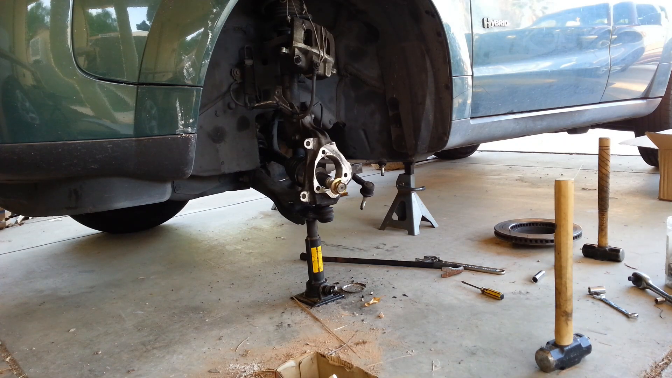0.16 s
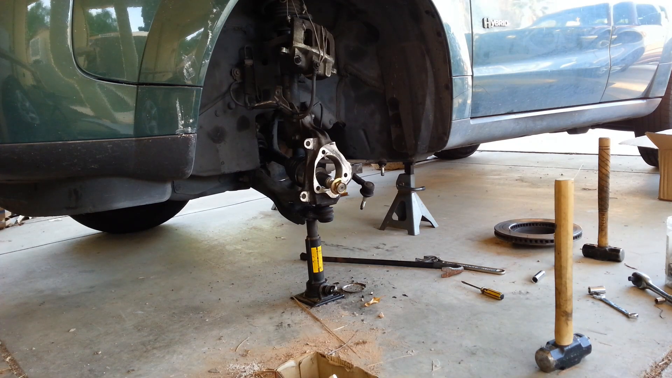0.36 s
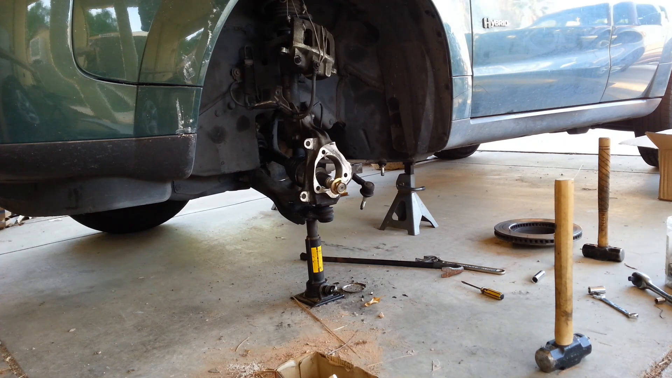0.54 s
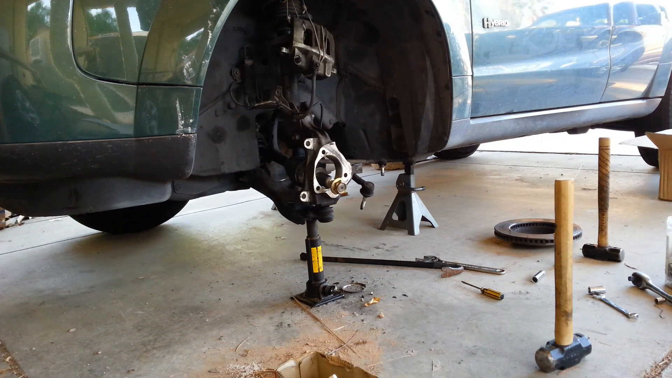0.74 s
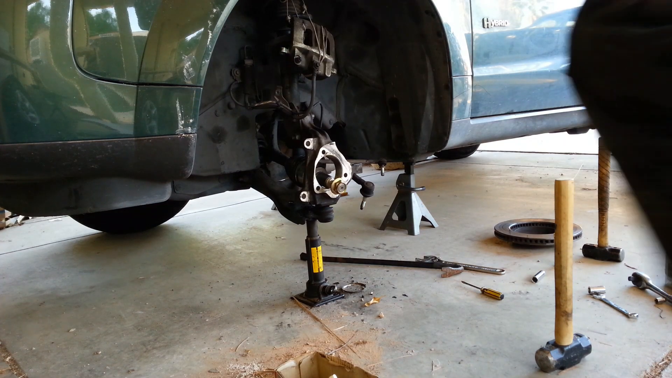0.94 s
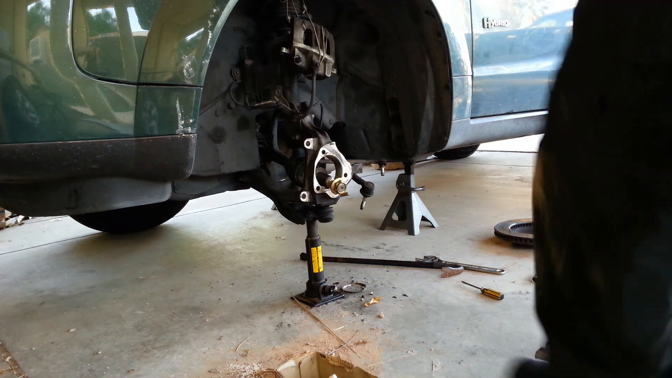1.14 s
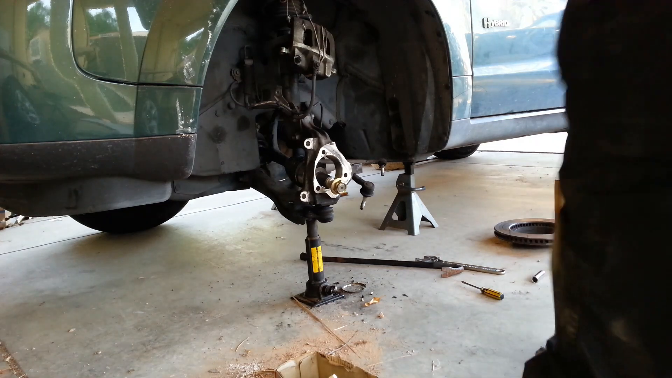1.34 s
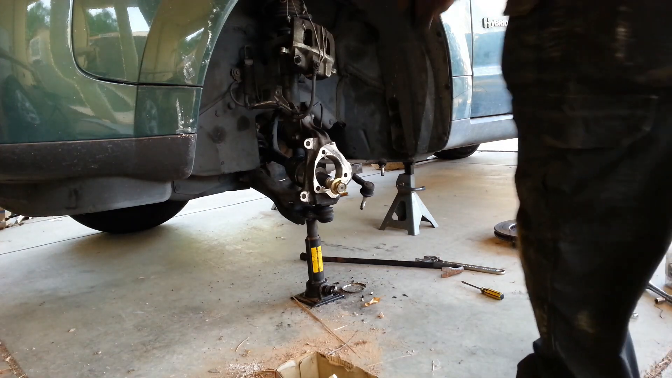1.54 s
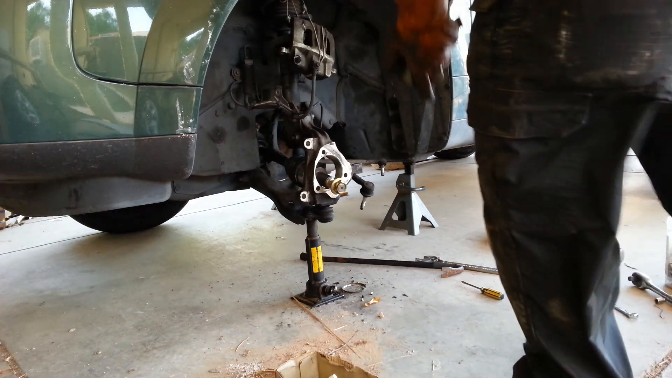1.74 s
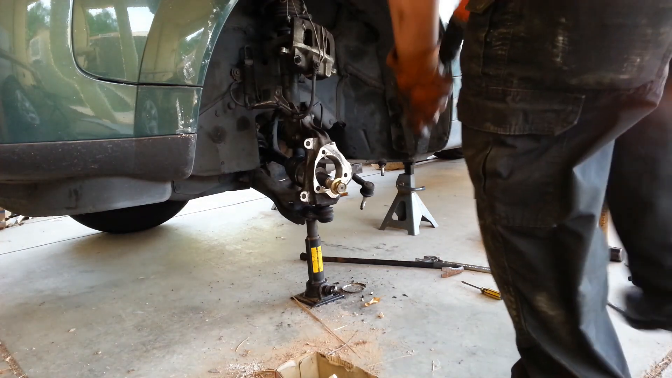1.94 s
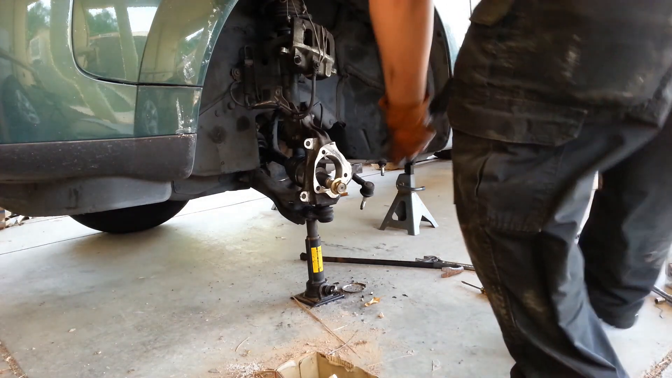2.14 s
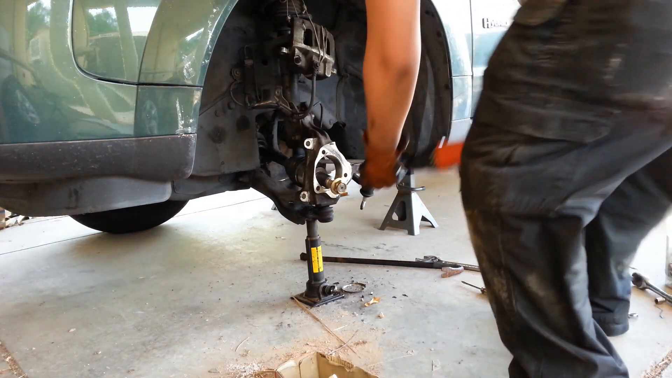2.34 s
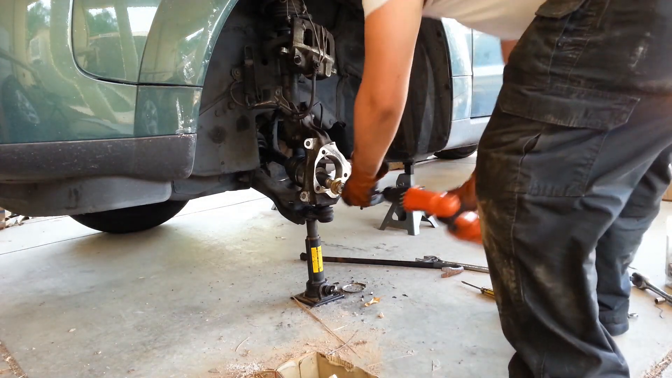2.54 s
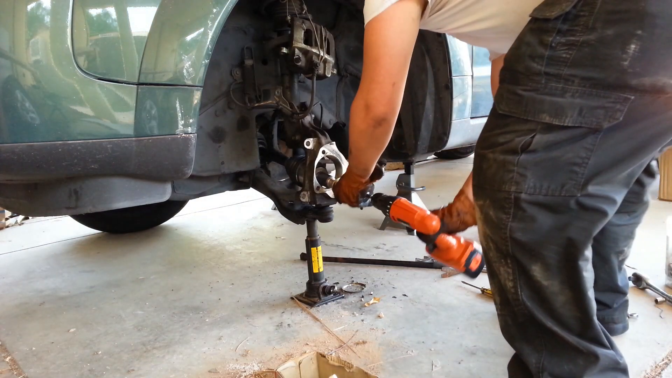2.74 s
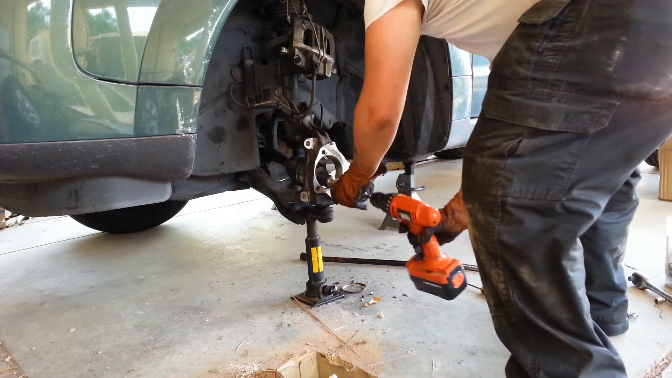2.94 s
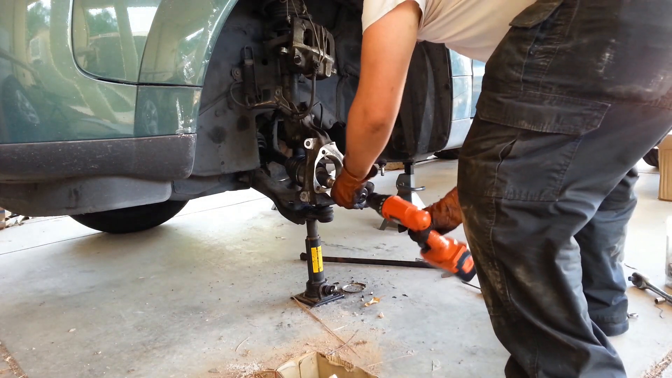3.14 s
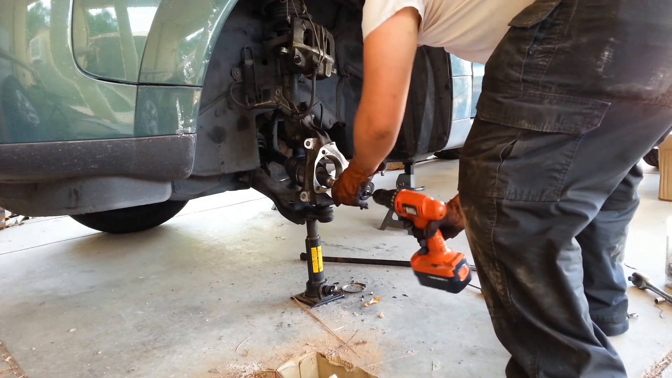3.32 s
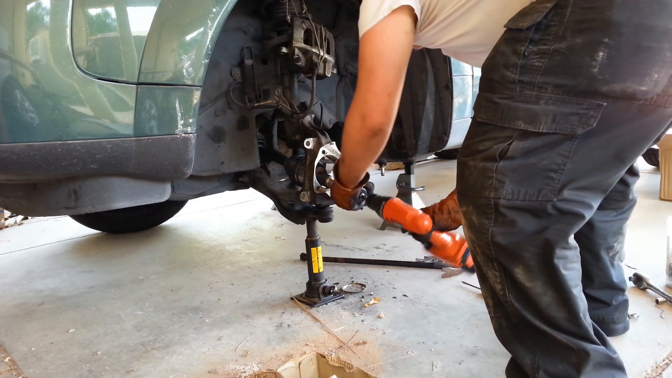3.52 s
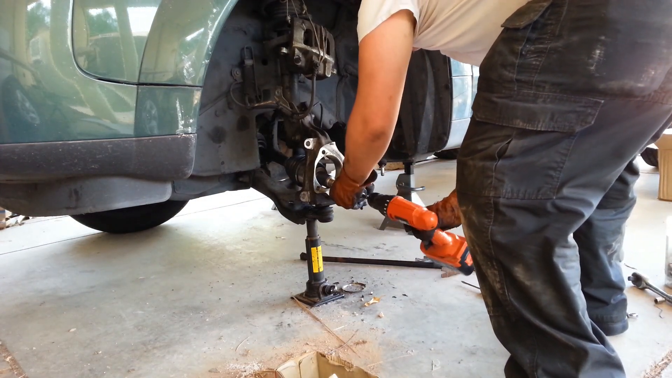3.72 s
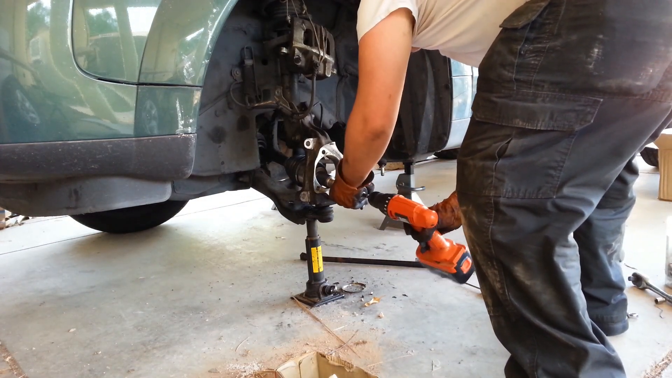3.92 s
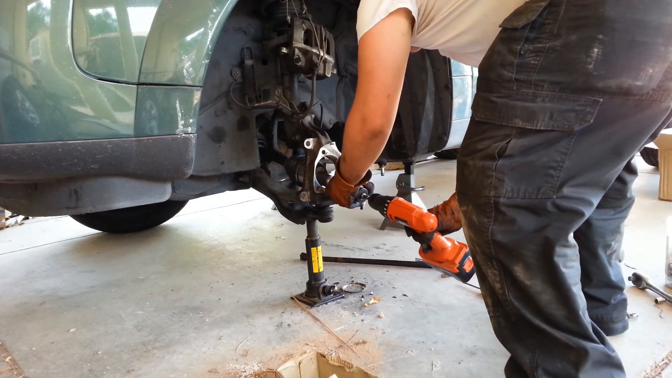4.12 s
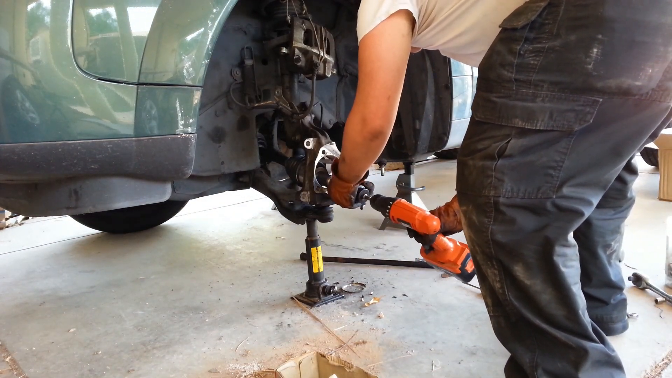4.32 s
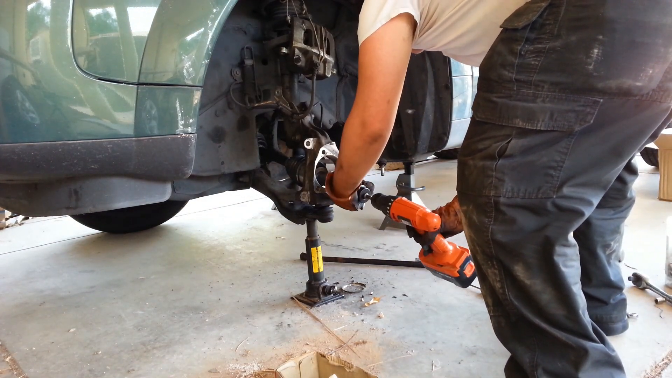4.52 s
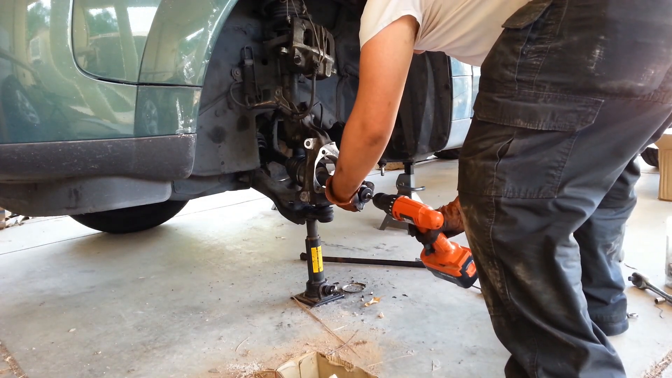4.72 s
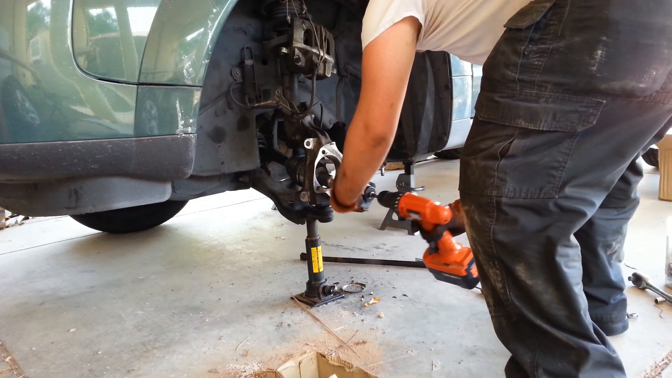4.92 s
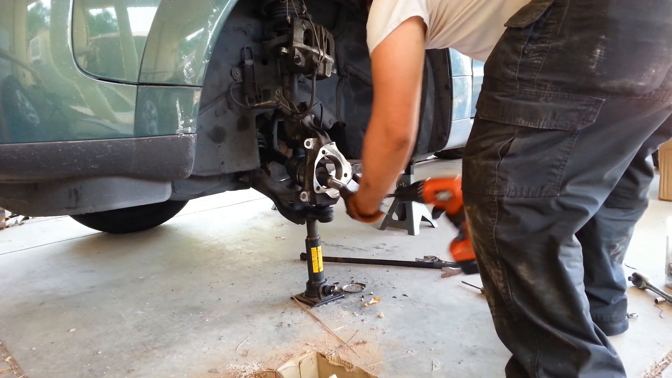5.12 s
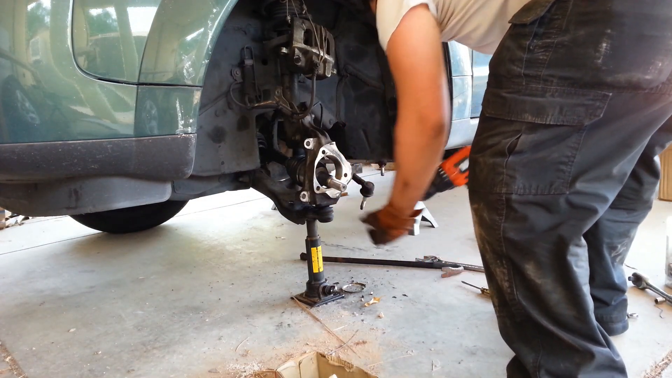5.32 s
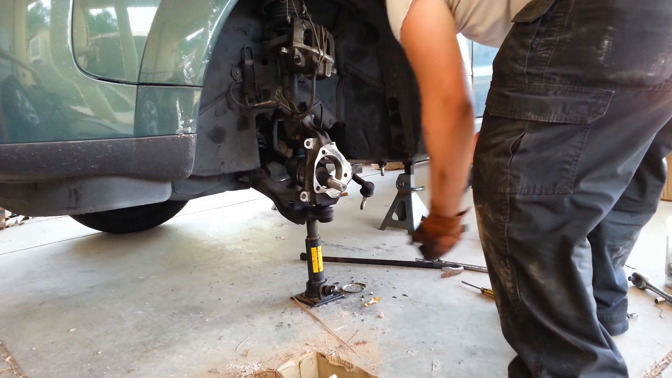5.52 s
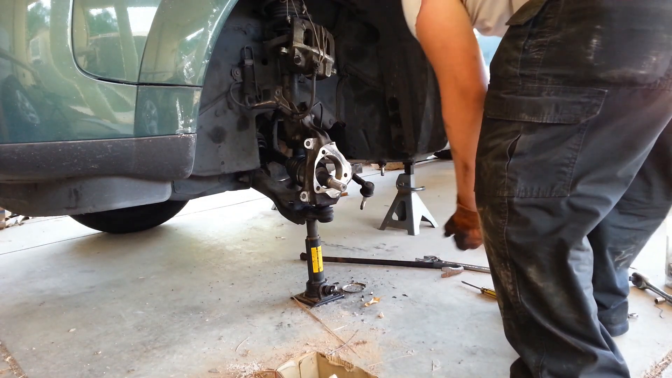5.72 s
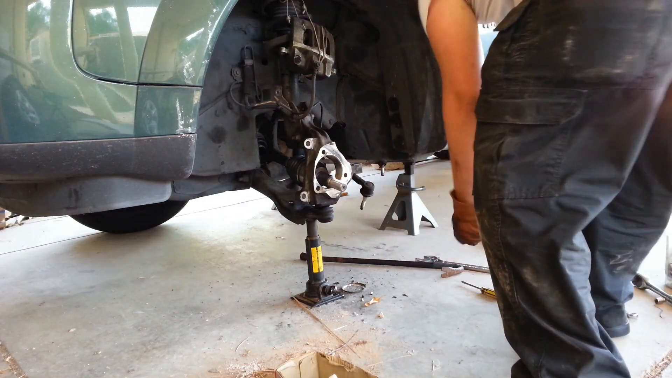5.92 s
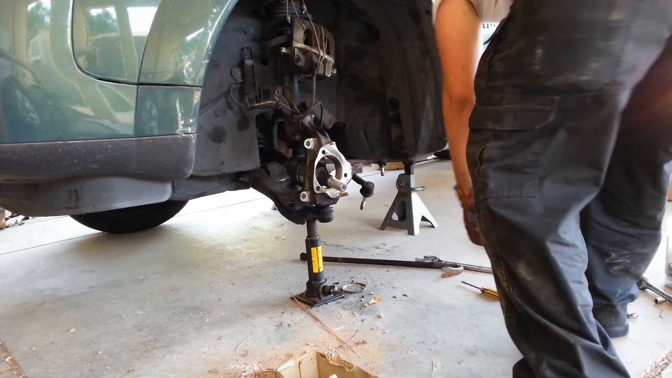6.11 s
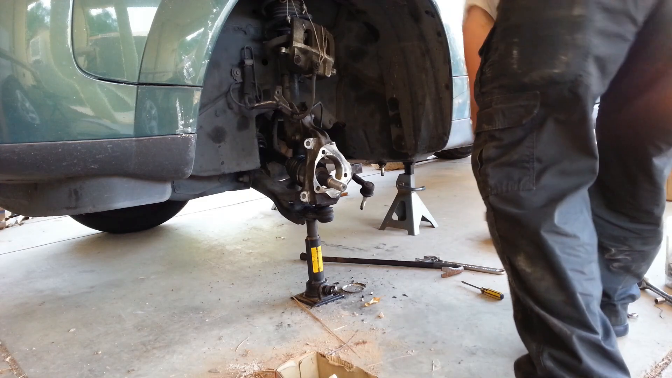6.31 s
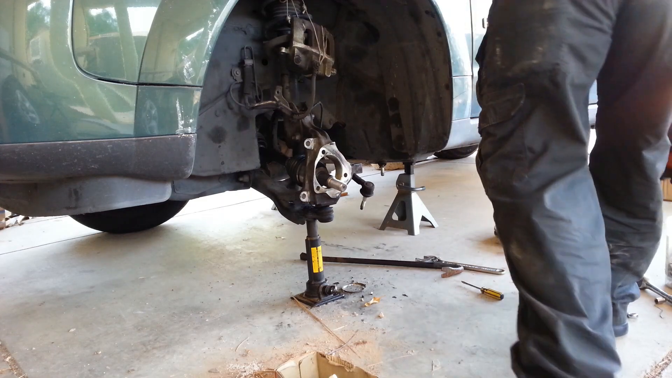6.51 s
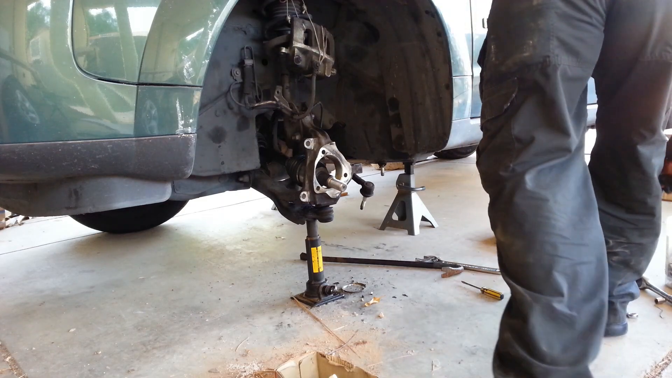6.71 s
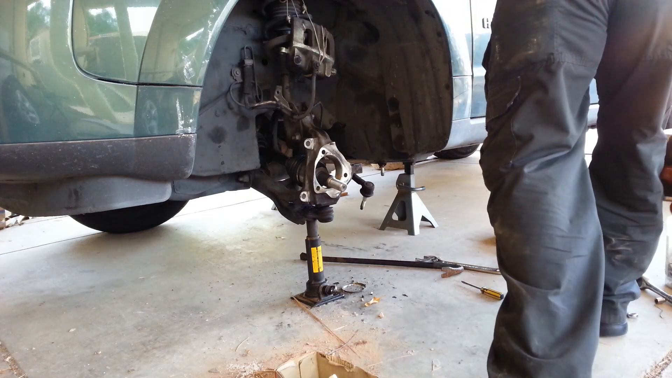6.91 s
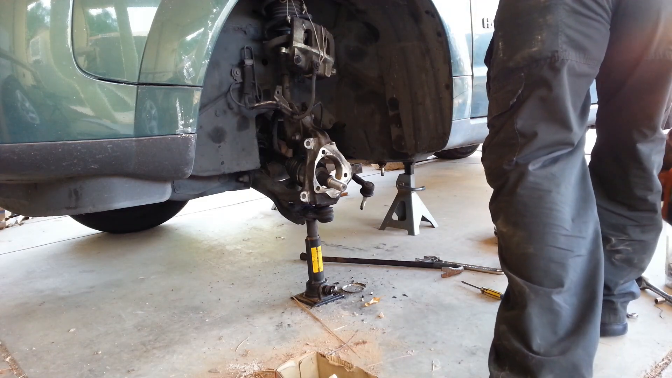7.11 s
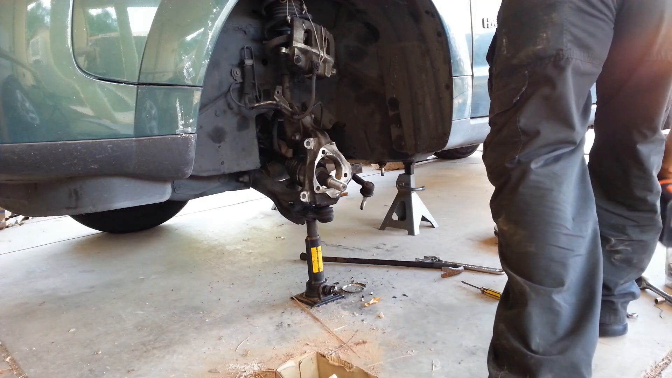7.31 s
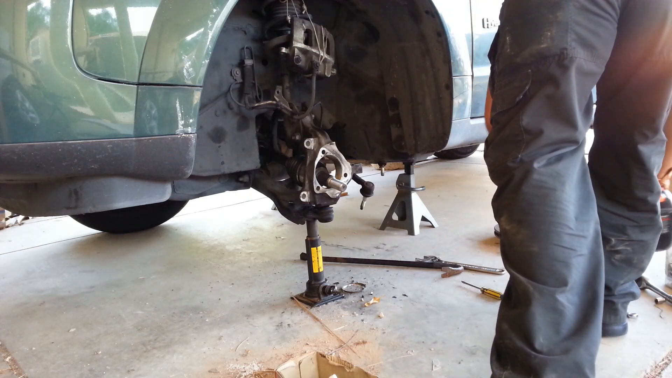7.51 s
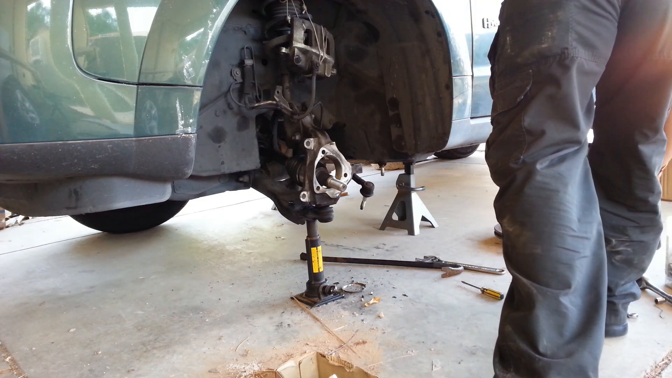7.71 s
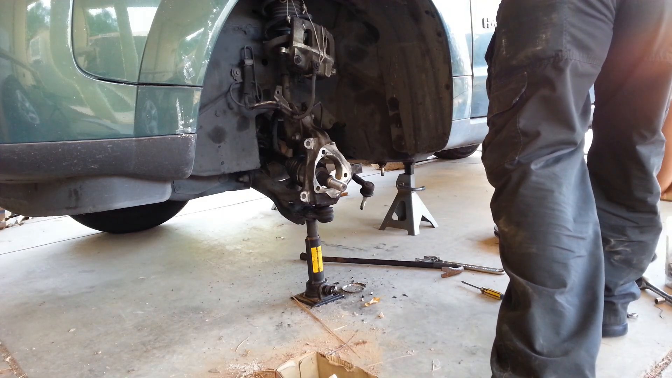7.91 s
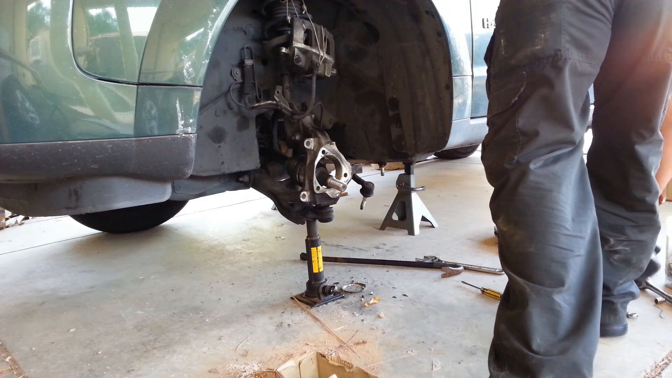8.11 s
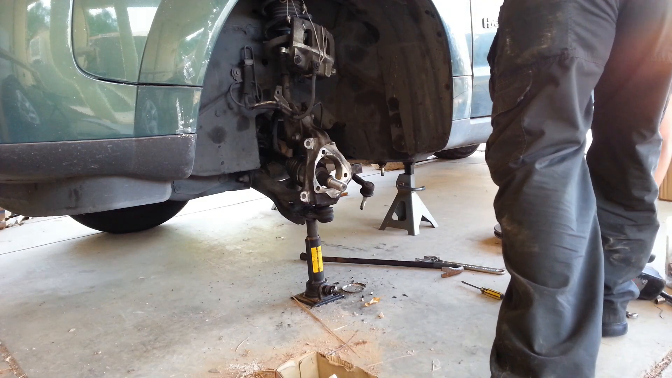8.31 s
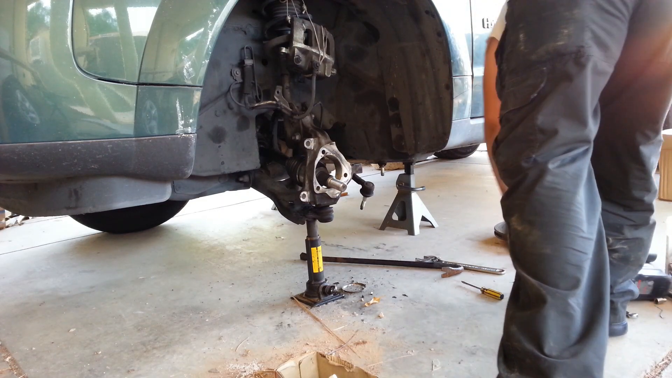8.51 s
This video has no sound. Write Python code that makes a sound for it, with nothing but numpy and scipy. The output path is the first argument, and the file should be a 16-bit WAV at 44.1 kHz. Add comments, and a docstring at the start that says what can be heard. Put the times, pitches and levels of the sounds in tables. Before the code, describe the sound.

In an open concrete garage with faint outdoor air and mains hum, a cordless drill whirs freely for about a second. Work trousers rustle and boots thud, then a socket clanks brightly on a steel hub. The drill runs again, steadier and rougher under load, and winds down. Cloth swishes, grit ticks, a spanner jingles softly and a heavy tool is put down. Close stereo microphone, short hard room echo.

```python
"""Cloth rustles over outdoor air and mains hum, then a cordless drill whines up in an open concrete garage.
The drill runs twice: tones and hiss follow tables of motor speed. Between and after the bursts come
clanks of the socket on a steel hub, spanner jingles, grit ticks, boots and a heavy put-down,
built from noise bursts and decaying sines. Swishes are uneven noise; a noise echo makes the room."""
import sys
import numpy as np
from scipy import signal
from scipy.fft import rfft, irfft, next_fast_len
from scipy.io import wavfile
from scipy.ndimage import uniform_filter1d

SR = 44100
rng = np.random.default_rng(int(sys.argv[2]) if len(sys.argv) > 2 else 0)


def bounce(signal):
    """Save signal as a 16-bit WAV file at the path given by the first command-line argument."""
    frames = np.transpose(np.atleast_2d(signal))
    limited = np.clip(frames, -1, 1)
    pcm = np.round(limited * 32767).astype(np.int16)
    wavfile.write(sys.argv[1], SR, pcm)


N = 377055
T = np.arange(N) / SR
FULL_HZ = 838  # commutation rate at full speed
CONTACT_S, TICK_RISE_S, BODY_RISE_S = .0015, .003, .012  # rise times: hard blow, grit, bass of the hub

# Modes of the steel hub. Each row: frequency in Hz, level in dB, T60 in seconds.
HUB_MODES = [(254, -8, 0.11), (535, -3, .14), (945, -8, .05)]


def undb(db):
    """Decibels to amplitude ratio."""
    return 10 ** (np.asarray(db) / 20)


def unit(x):
    """Scale to RMS 1."""
    return x / np.sqrt(np.mean(x ** 2))


def colour(x, points):
    """Weigh the spectrum by (Hz, dB) points, joined on a log frequency axis."""
    hz, db = np.transpose(points)
    size = next_fast_len(N)
    f = np.fft.rfftfreq(size, 1 / SR) + 1
    gain = undb(np.interp(np.log(f), np.log(hz), db))
    return irfft(rfft(x, size) * gain)[..., :N]


def band(x, lo_hz, hi_hz):
    """Butterworth band-pass."""
    sos = signal.butter(3, [lo_hz, min(hi_hz, SR / 2.2)], "band", fs=SR, output="sos")
    return signal.sosfilt(sos, x)


def walk(rate_hz):
    """Random wander: Gaussian levels held 1 / rate_hz seconds, smoothed twice."""
    k = int(SR / rate_hz)
    steps = np.repeat(rng.standard_normal(N // k + 1), k)
    return 1.3 * uniform_filter1d(uniform_filter1d(steps, k), k)[:N]


def fade(t60_s, size=SR // 2):
    """Exponential decay, 60 dB in t60_s."""
    return np.exp(-np.log(1000) * np.arange(size) / SR / max(t60_s, 1e-3))


def ring(modes):
    """One blow on a set of modes: decaying sines, each struck a little differently."""
    t = T[:SR // 2]
    return sum(undb(db + 3.7 * rng.standard_normal()) * fade(t60_s) * np.sin(2 * np.pi * hz * t)
               for hz, db, t60_s in modes)


def crack(lo_hz, hi_hz, t60_s, rise_s=CONTACT_S):
    """Impact noise: a contact click in a burst of band-passed noise that dies away."""
    click_share = .75  # relative to the root energy of the burst
    size = min(int(2 * t60_s * SR), SR // 2)
    decay = fade(t60_s, size)
    noise = rng.standard_normal(size) * decay * (1 - np.exp(-T[:size] / rise_s))
    noise[int(rise_s * SR / 2)] += click_share * np.sqrt(np.sum(noise ** 2))
    burst = unit(band(noise, lo_hz, hi_hz)) * np.sqrt(np.mean(decay ** 2)) / 2
    return np.pad(burst, (0, SR // 2 - size))


def add(out, start_s, sound, pan_db=0):
    """Mix a mono sound into out; pan_db is left minus right."""
    i = int(start_s * SR)
    sides = undb(np.array([[pan_db], [-pan_db]]) / 2)
    out[:, i:i + len(sound)] += sides * sound[:N - i]


def rustle():
    """Friction as dense uneven grains: swish of cloth and soles, duller body of rubbing boots and parts."""
    # Each row: loudest moment in seconds, swish level in dB, rise in seconds per 10 dB,
    # fall in seconds per 10 dB, body level in dB over the swish.
    swishes = [(.02, -47, .1, .1, -6), (1.11, -45, .03, .12, -5), (1.53, -39, .1, .12, -16),
               (2.05, -54, .6, .5, -19), (2.35, -33, .012, .12, -12), (2.84, -42, .15, .025, -2),
               (2.955, -34, .025, .08, -3), (3.13, -48, .15, .08, 1), (3.43, -44, .1, .1, 4),
               (3.66, -42, .08, .2, 0), (3.82, -48, .1, .04, 0), (5.15, -43, .03, .04, -8),
               (5.65, -49, .02, .05, -16), (5.82, -42, .1, .1, -16), (5.92, -41, .1, .15, -14),
               (6.17, -51, .2, .02, -12), (6.59, -40, .14, .12, -21), (6.79, -50, .2, .02, -18),
               (7.06, -53, .06, .06, -5), (7.39, -48, .15, .04, -7), (7.52, -46, .02, .06, -18),
               (7.59, -41, .03, .04, -20), (8.13, -51, .04, .06, -9), (8.31, -52, .02, .1, -5),
               (8.45, -47, .12, .1, 2)]
    peak_s, db, rise_s, fall_s, body_db = np.transpose(swishes)[:, :, None]
    coarse = T[::64]
    slopes = np.maximum((peak_s - coarse) / rise_s, (coarse - peak_s) / fall_s)
    swish_power = undb(2 * db - 20 * slopes)
    body_power = swish_power * undb(2 * body_db)
    swish_gain = np.interp(T, coarse, np.sqrt(swish_power.sum(0)))
    body_gain = np.interp(T, coarse, np.sqrt(body_power.sum(0)))
    unevenness_db = 2.6 * rng.exponential(size=(3, N)) + 2.2 * walk(60)
    grains = rng.standard_normal((3, N)) * undb(unevenness_db)
    swish = unit(colour(grains[:2], [(1000, -13), (3000, -5.5), (5300, 0.5), (7200, 1.5),
                                     (9000, -10.5), (14000, -23.5)]))
    # the hollow wheel arch rings near 540 Hz
    body = unit(band(grains[2], 129, 1007)) + 0.6 * unit(band(grains[2], 480, 600))
    return swish_gain * swish + body_gain * body


def outdoor_air():
    """Wavering coloured noise, mid plus side, with the side weak in the bass."""
    # Each row: frequency in Hz, relative spectral level in dB.
    spectrum = [(26, -42.5), (45, -7), (198, -12.5), (241, -10), (272, -15.5), (464, -19.5), (621, -27),
                (15000, -46.5)]
    mid, side = colour(rng.standard_normal((2, N)), spectrum)
    side = colour(side, [(60, -3), (300, -6), (1300, 3.5)])
    stereo = mid + side * np.array([[1], [-1]])
    return undb(-54.5 + 1.2 * walk(12)) * stereo / np.std(mid)


def mains_hum():
    """Sines near multiples of the mains rate, wavering in level and phase."""
    # Each row: frequency in Hz, nominal RMS level in dB.
    lines = [(59.5, -63), (119.5, -62.5), (239.5, -60.5), (470, -68.5)]
    hum = sum(undb(db + 3.5 * walk(8)) * np.sin(2 * np.pi * hz * T + .5 * walk(7.1)) for hz, db in lines)
    return np.sqrt(2) * hum


def trigger_tones():
    """Switch tones as the trigger is squeezed: short glides whose pitch wanders in proportion to the glide."""
    # Each row: start in seconds, end in seconds, first Hz, last Hz, nominal level in dB.
    glides = [(.034, .065, 4150, 4900, -36), (3.865, 3.935, 4025, 4035, -54),
              (3.918, 3.952, 4250, 4800, -33)]
    out = np.zeros((2, N))
    for start_s, end_s, first_hz, last_hz, db in glides:
        i = slice(int(start_s * SR), int(end_s * SR))
        hz = np.linspace(first_hz, last_hz, i.stop - i.start) + .4 * (last_hz - first_hz) * walk(900)[i]
        tone = np.sin(2 * np.pi * np.cumsum(hz) / SR)
        level = undb(db + 3 * walk(400)[i])
        add(out, start_s, level * tone * signal.windows.tukey(len(tone), .4))
    return out


def motor_hum(hz, phase):
    """Commutation hum: stronger under torque (speed change) and at the housing resonance."""
    hum_db, torque_db = -53, -33
    housing_hz, housing_width_hz, housing_db = 545, 40, -40
    hard_hz_per_s = 6000  # speed change that scales the torque
    slope = uniform_filter1d(np.gradient(hz) * SR, size=800)
    torque = np.tanh(np.abs(slope) / hard_hz_per_s)
    housing = np.exp(-((hz - housing_hz) / housing_width_hz) ** 2)
    level = undb(hum_db) + undb(torque_db) * torque ** 2 + undb(housing_db) * housing
    return level * np.sin(phase)


def whine_tones(phase, partials):
    """Partials locked to the motor, each swelling on its own on each side as the hand turns the tool."""
    out = 0
    for multiple, db in partials:
        swell_db = 1.8 * walk(7) + 2.5 * np.array([walk(35), walk(35)])
        out = out + undb(db + swell_db) * np.sin(multiple * phase + 0.4 * walk(80))
    return out


def labouring_tones(hz, hiss_db, phase):
    """Rough partials with jittered phase, heard only as they pass near a resonance."""
    # Each row: multiple of the commutation rate, level in dB over the hiss, resonance in Hz.
    partials = [(9, -8, 6600), (11, -10, 7400)]
    out = 0
    for multiple, db, peak_hz in partials:
        nearness = np.exp(-((multiple * hz / peak_hz - 1) / .08) ** 2)
        level = undb(hiss_db + db + 4.0 * walk(40))
        out = out + level * nearness * np.sin(multiple * phase + 3.5 * walk(90))
    return out


def shaft_lines(phase):
    """Weak swelling lines at multiples 3 to 30 of the shaft turn, a third of the commutation rate."""
    return sum(undb(-53 + 4 * walk(15)) * np.sin(k * phase / 3 + k * k) for k in np.arange(3, 31))


def brush_hiss(hz, phase):
    """Brush and fan noise pulsing with the motor; clatter rings the gearbox case, most at part speed."""
    # Each row: frequency in Hz, relative spectral level in dB.
    spectrum = [(88, -30), (150, -13), (278, -9.5), (1010, -8.5), (1380, -4.5), (3700, -7), (6900, 1.5),
                (9000, -5.5), (12400, -13.5), (15000, -23.5)]
    # Each row: frequency in Hz, width in Hz, level in dB over the hiss before the fall with speed.
    case_bands = [(545, 60, -24), (1420, 220, -22)]
    case_quiet_db = -7  # added at full speed
    # the brushes spit once a shaft turn and once a commutation
    spit = 1 + 0.16 * np.cos(phase / 3) + 0.23 * np.cos(phase)
    noise = rng.standard_normal(N) + 1.37 * rng.standard_normal((2, N))  # vents face several ways
    noise *= undb(3 * rng.exponential(size=N))  # gear teeth clatter unevenly
    hiss = unit(colour(noise * spit * undb(1.1 * walk(150)), spectrum))
    case = sum(undb(db) * unit(band(hiss, f - w / 2, f + w / 2)) for f, w, db in case_bands)
    return hiss + undb(case_quiet_db * (hz / FULL_HZ) ** 4) * case


def drill():
    """Motor sounds locked to the commutation rate; returns the rough part and the whine separately."""
    # One list a burst. Each row: time in seconds, commutation rate in Hz, hiss level in dB.
    speeds = [
        [(.045, 216, -33), (.08, 325, -28), (.13, 781, -25), (.23, 700, -27), (.3, 620, -28.5),
         (.355, 670, -25.5), (.45, 590, -31), (.53, 519, -29), (.575, 760, -27.5), (.61, 815, -26),
         (.635, 856, -25.5), (.74, 873, -25), (.95, 885, -24.5), (1.0, 843, -23), (1.025, 603, -24),
         (1.1, 415, -30)],
        [(3.945, 300, -29), (3.97, 549, -27), (4.02, 780, -25), (4.07, 842, -24), (4.14, 853, -24),
         (4.3, 856, -25), (4.44, 843, -26), (4.6, 851, -25.5), (4.78, 853, -25), (4.9, 842, -26),
         (5.0, 760, -27), (5.09, 590, -29), (5.18, 450, -30)],
    ]
    # One list a burst. Each row: multiple of the commutation rate, level in dB over the whine level.
    whines = [
        [(3, -4.5), (5, -5), (7, 2), (8, 12), (9, -4), (10, -1)],
        [(3, -6), (5, -4), (6, 4), (7, 4), (8, 7), (9, 1), (10, -5), (11, 0), (14, -8.5)],
    ]
    # Shaft and gear mesh. Each row: multiple of the commutation rate, level in dB over the whine level.
    gears = [(.333, -14), (.638, -9), (1.594, -15)]
    # Each row: trigger pulled in seconds, release begins in seconds, bolt in the socket 0 or 1.
    pulls = [(.04, 1.022, 0), (3.935, 5.097, 1)]
    attack_s, release_s = .035, .045  # per 20 dB
    whine_db, droop_db_per_hz = -32, 0.2  # level at full speed; loss below it
    grind, sung = np.zeros((2, 2, N))
    for speed, whine, (start_s, stop_s, loaded) in zip(speeds, whines, pulls):
        s, hz, hiss_db = np.transpose(speed)
        hz, hiss_db = np.interp(T, s, hz), np.interp(T, s, hiss_db)
        rise, fall = (T - start_s) / attack_s - 1, (stop_s - T) / release_s
        gate = (T > start_s) * undb(20 * np.minimum(np.minimum(rise, fall), 0))
        phase = 2 * np.pi * np.cumsum(hz * (1 + .001 * walk(40))) / SR
        droop = undb(droop_db_per_hz * np.minimum(hz - FULL_HZ, 0))
        # rough partials take over where the whine droops
        rough = (1 - droop) * labouring_tones(hz, hiss_db, phase)
        if loaded:
            rough = rough + shaft_lines(phase)
        grind += gate * (rough + motor_hum(hz, phase) + undb(hiss_db) * brush_hiss(hz, phase))
        partials = whine + gears if loaded else whine
        sung += gate * undb(whine_db) * droop * whine_tones(phase, partials)
    return grind, sung


def ticks():
    """Grit and small parts: very short noise bursts, a narrow band of random pitch plus a broad one."""
    # Each row: start in seconds, level in dB.
    hits = [(1.075, -24), (1.2083, -30), (1.3865, -25), (1.8822, -26), (2.9568, -18), (3.1184, -25.5),
            (3.3593, -27), (3.497, -22), (3.579, -27), (3.6197, -25), (3.666, -25), (5.2772, -33),
            (5.6388, -33), (5.815, -26), (5.911, -20), (6.345, -27), (6.461, -26), (6.5732, -20),
            (6.5962, -19), (6.7795, -30), (7.5083, -30), (7.5571, -25), (7.5824, -25), (7.8461, -32),
            (8.1076, -27)]
    out = np.zeros((2, N))
    for s, db in hits:
        hz = 6300 * (1 + .1 * rng.standard_normal())
        narrow = crack(hz / 1.39, hz * 1.2, 0.012, TICK_RISE_S)
        broad = crack(2000, 10000, 0.012, TICK_RISE_S)
        add(out, s, undb(db) * (narrow + undb(-3) * broad))
    return out


def thuds():
    """Boots and the heavy put-down: a low noise burst with a brighter slap, left of centre."""
    # Each row: start in seconds, level in dB, centre in Hz, T60 in seconds, slap in dB over the thud.
    hits = [(1.345, -25.5, 275, 0.09, -24), (2.258, -27, 285, 0.08, -32), (8.335, -20, 420, 0.17, -5),
            (8.405, -32, 700, 0.12, -10)]
    out = np.zeros((2, N))
    for s, db, hz, t60_s, slap_db in hits:
        slap = crack(1000, 3000, 0.2) + 0.85 * crack(3000, 7900, 0.12)
        add(out, s, undb(db) * (crack(hz / 2.2, hz * 1.9, t60_s) + undb(slap_db) * slap), 3)
    return out


def clanks():
    """Socket on hub: bright snap with a bounce, ringing socket modes, duller knock with hub modes."""
    # Each row: start in seconds, level in dB, knock in dB over the snap, crack T60 in seconds,
    # left minus right in dB, ring in dB over the snap.
    hits = [(2.3438, -18, -15, 0.13, 3, -20), (2.6851, -7.5, -13, 0.044, -2.5, -8),
            (2.9716, -14.5, -9.5, 0.047, -0.5, -28), (3.0114, -14, -13.5, 0.018, -5.5, -8),
            (3.3874, -16.5, -14, 0.025, 5.5, -37), (3.7169, -7.5, -11.5, 0.029, -8.5, -21)]
    # Each row: frequency in Hz, level in dB, T60 in seconds.
    socket_modes = [(6785, 0, .04), (7620, -1, 0.04), (7709, 6.5, 0.1), (12750, -19, 0.11)]
    out = np.zeros((2, N))
    for s, db, knock_db, t60_s, pan_db, ring_db in hits:
        knock = crack(850, 2250, 0.05) + 0.75 * crack(200, 650, 0.17, BODY_RISE_S)
        knock = knock + undb(-11) * ring(HUB_MODES)
        snap = crack(2400, 8200, t60_s) + 1.6 * crack(4940, 8000, 0.026)
        bounce_s = rng.uniform(.002, .005)
        snap = snap + 1.3 * np.roll(crack(4500, 8000, .02), int(bounce_s * SR))
        clank = snap + undb(ring_db) * ring(socket_modes) + undb(knock_db) * knock
        add(out, s, undb(db) * clank, pan_db)
    return out


def knocks():
    """Socket settling on the hub: hub modes with a soft onset, tilted in brightness."""
    # Each row: start in seconds, level in dB, brightness in dB per octave.
    hits = [(2.788, -32, 10), (2.998, -26, 0), (3.4, -29, 0), (3.478, -35, 0), (3.732, -28, 0)]
    out = np.zeros((2, N))
    onset = 1 - np.exp(-T[:SR // 2] / TICK_RISE_S)
    top_hz = HUB_MODES[-1][0]
    for s, db, tilt_db in hits:
        modes = [(hz, mode_db + tilt_db * np.log2(hz / top_hz), t60_s) for hz, mode_db, t60_s in HUB_MODES]
        add(out, s, undb(db) * ring(modes) * onset)
    return out


def jingles():
    """Spanner: a noise burst, ringing steel modes and a lower burst."""
    # Each row: start in seconds, level in dB, ring in dB over the burst.
    hits = [(7.0318, -33.5, -19), (7.1715, -27.5, -17), (7.24, -29, -15), (7.2993, -32.5, -13),
            (7.3451, -34.5, -13)]
    # Each row: frequency in Hz, level in dB, T60 in seconds.
    spanner_modes = [(2844, 6, 0.058), (3160, 6, 0.06), (4420, -3, 0.042), (12730, 2, 0.22)]
    out = np.zeros((2, N))
    for s, db, ring_db in hits:
        burst = crack(2140, 6200, 0.08, TICK_RISE_S)
        low = undb(-6.5) * crack(270, 1350, 0.071)
        add(out, s, undb(db) * (burst + undb(ring_db) * ring(spanner_modes) + low))
    return out


def bumps():
    """Soft low bumps: bass noise bursts."""
    # Each row: start in seconds, level in dB.
    hits = [(7.968, -37), (8.215, -36), (8.385, -30), (8.435, -29), (8.475, -32), (8.515, -30)]
    out = np.zeros((2, N))
    for s, db in hits:
        add(out, s, undb(db) * crack(38, 260, .2))
    return out


def steel_bar():
    """A bar shaken by the put-down: one decaying sine."""
    # One row: start in seconds, level in dB, frequency in Hz, T60 in seconds.
    bar = (8.345, -37, 7666, .9)
    s, db, hz, t60_s = bar
    out = np.zeros((2, N))
    add(out, s, undb(db) * fade(t60_s) * np.sin(2 * np.pi * hz * T[:SR // 2]))
    return out


def garage(dry):
    """Concrete walls: a decaying noise echo for each side, shorter in the treble, alike in the bass."""
    # Each row: frequency in Hz, T60 in seconds.
    room_t60 = [(200, 0.43), (1500, 0.29), (6000, 0.27), (14000, 0.099)]
    room_db, gap_s = -3.5, .003
    hz, t60_s = np.transpose(room_t60)
    echo = 0
    for f in 125 * 2. ** np.arange(7):  # octave bands
        decay = fade(np.interp(np.log(2.0 * f), np.log(hz), t60_s))
        mid, side = band(rng.standard_normal((2, SR // 2)), f, 2 * f) * decay
        apart = min(f / 1100, 1)
        stereo = mid + apart * side * np.array([[1], [-1]])
        echo = echo + stereo / np.sqrt((1 + apart ** 2) * np.sum(mid ** 2) * SR / 2 / f)
    echo = np.pad(echo, ((0, 0), (int(gap_s * SR), 0)))
    wet = signal.fftconvolve(dry.mean(0, keepdims=True), echo, axes=1)[:, :N]
    return dry + undb(room_db) * wet


def scene():
    """All but the whine, air and mains hum pass through the room."""
    grind, whine = drill()
    blows = ticks() + thuds() + clanks() + knocks() + jingles() + bumps() + steel_bar()
    return garage(rustle() + trigger_tones() + grind + blows) + whine + outdoor_air() + mains_hum()


def record(dry):
    """Two capsules differing in colour and phase; the loudest peaks are rounded and the top is cut."""
    # Each row: frequency in Hz, left minus right in dB.
    mic_tilt = [(60, -2), (200, 4), (4500, 2), (8000, -6), (14000, 2)]
    port_hz, top_hz, ceiling = 5030, 15050, .75
    hz, db = np.transpose(mic_tilt)
    left, right = (colour(x, np.transpose([hz, sign * db / 2])) for x, sign in zip(dry, (1, -1)))
    # all-pass: the right port turns the phase a quarter cycle at port_hz
    warp = np.tan(np.pi * port_hz / SR)
    a = (warp - 1) / (warp + 1)
    right = signal.lfilter([a, 1], [1, a], right)
    rounded = ceiling * np.tanh(np.array([left, right]) / ceiling)
    return signal.sosfilt(signal.ellip(12, .2, 70, top_hz, fs=SR, output="sos"), rounded)


dry = scene()
out = record(dry)
bounce(out)
```